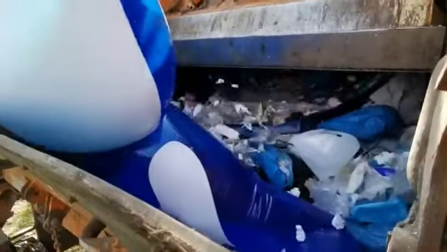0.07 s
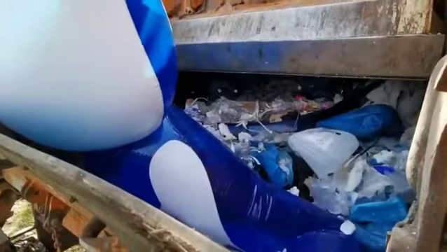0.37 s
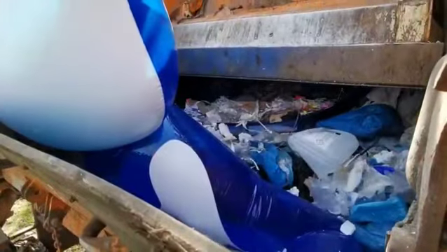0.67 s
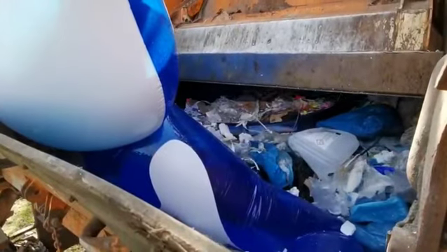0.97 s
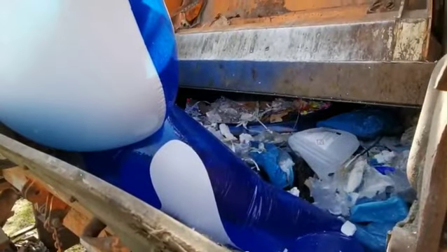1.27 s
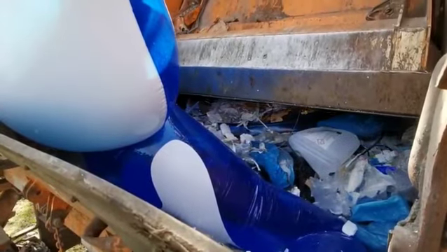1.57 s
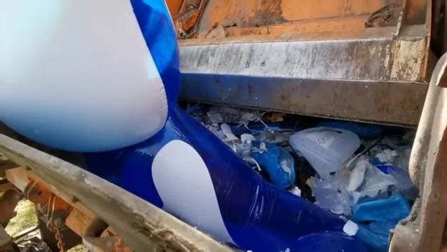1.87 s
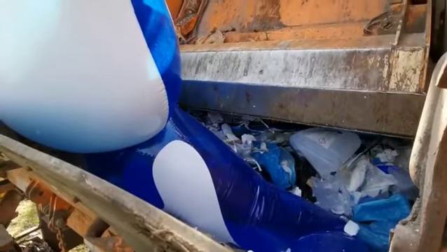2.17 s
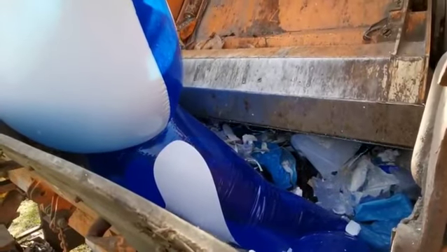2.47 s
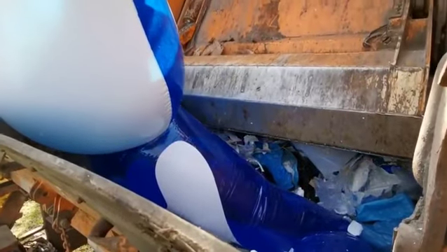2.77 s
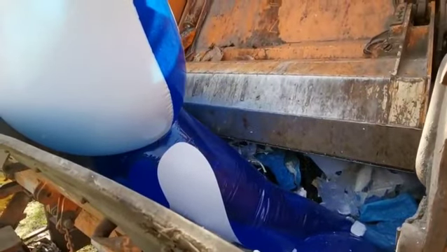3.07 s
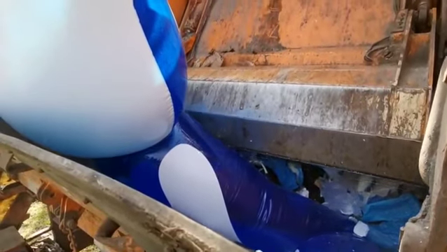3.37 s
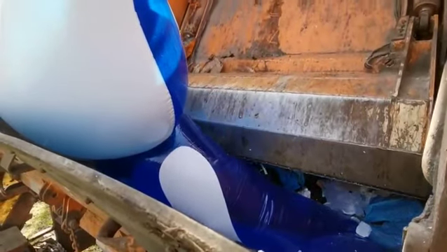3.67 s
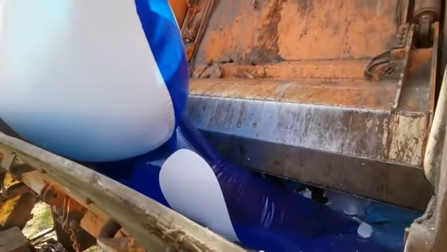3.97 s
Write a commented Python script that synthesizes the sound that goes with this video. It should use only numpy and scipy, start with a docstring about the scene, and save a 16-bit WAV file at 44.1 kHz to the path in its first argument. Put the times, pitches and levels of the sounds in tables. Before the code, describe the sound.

A garbage truck's compactor works close by, its hydraulic pump humming over rushing oil and a diesel rumble. In the first half second, trash gives way with loud crackling, booming thuds and hollow knocks on steel. Plastic snaps several times before 0.8 seconds, again near 1.8, then more faintly. The hum deepens from about 1.5 seconds and holds until 4. A small bird chirps faintly from 2.3 to 3.7 seconds.

```python
"""A load gives way in a garbage truck's hopper, heard from beside it on a stereo microphone pair.
Debris crackles in a spray, lumps thud and knock in the steel tub, and plastic snaps now and then.
Behind it the hydraulic pump hums over rushing oil and the diesel engine, deeper as the blade
comes down and takes up load. Out in the street a small bird sings a falling phrase."""
import sys
import numpy as np
from scipy import signal
from scipy.fft import rfft, irfft, next_fast_len
from scipy.io import wavfile
from scipy.ndimage import uniform_filter1d, map_coordinates

SR = 44100
rng = np.random.default_rng(int(sys.argv[2]) if len(sys.argv) > 2 else 0)


def to_wav(s):
    """Save 16-bit WAV."""
    ch = np.atleast_2d(s).T  # columns
    pcm = np.round(np.clip(ch, -1, 1) * 32767)  # PCM
    wavfile.write(sys.argv[1], SR, pcm.astype(np.int16))


N = 176400
PUMP_HZ = 192.5


def amp(db):
    """Decibels to gain."""
    return 10 ** (np.asarray(db) / 20)


def unit(x):
    """Scale to rms 1."""
    return x / np.sqrt(np.mean(x ** 2) + 1e-20)


def along(points, hz):
    """Read (freq_hz, value) points on a log frequency axis."""
    freqs, values = np.transpose(points)
    return np.interp(np.log(hz + 1), np.log(freqs + 1), values)


def curves(rows):
    """One value per sample for each column after the time."""
    times, *columns = np.transpose(rows)
    return [np.interp(np.arange(N) / SR, times, column) for column in columns]


def wobble(rate):
    """A smooth random curve, rate knots a second."""
    return map_coordinates(rng.standard_normal(1024), [np.arange(N) * rate / SR], mode="mirror")


def filtered(x, response):
    """Filter x by a gain given as a function of frequency."""
    size = next_fast_len(N + SR // 4)
    return irfft(rfft(x, size) * response(np.fft.rfftfreq(size, 1 / SR)), size)[..., :N]


def spread(pair, spectrum):
    """Two unrelated signals become one coloured stereo sound of rms 1."""
    # how alike the two microphones hear it: freq_hz, correlation
    likeness = [(150, 1), (270, 1), (400, 0.53), (650, 1), (1100, 0.42), (2000, 0.16), (6000, 0.15),
                (11000, 0.8)]

    def mid_side_gains(hz):
        angle = np.arccos(np.clip(along(likeness, hz), -1, 1)) / 2
        return amp(along(spectrum, hz)) * [np.cos(angle), np.sin(angle)]

    mid, side = filtered(pair, mid_side_gains)
    return unit(np.array([mid + side, mid - side]))


def rush(spectrum):
    """Coloured stereo noise of rms 1."""
    return spread(rng.standard_normal((2, N)), spectrum)


def patchy(x, depth_db):
    """Let narrow patches of a noise swell and sink, at rms 1 overall."""
    spectra = signal.stft(x, nperseg=1024)[2]
    field = uniform_filter1d(rng.standard_normal(spectra.shape[1:]), size=5, axis=0)
    field = unit(uniform_filter1d(field, size=12, axis=1))
    return unit(signal.istft(spectra * amp(depth_db * field), nperseg=1024)[1][:, :N])


def tone(hz):
    """A sine of rms 1 that follows a pitch curve."""
    return np.sqrt(2) * np.sin(2 * np.pi * (np.cumsum(hz) / SR + rng.random()))


def add(track, start_s, sound):
    """Mix a sound into the track at a time."""
    part = track[max(round(start_s * SR), 0):][:len(sound)]
    part += sound[:len(part)]


def blows(hits, rise_s, t60_s):
    """The envelope of (start_s, level_db) hits that rise and die away, summed in power."""
    power = np.zeros(N)
    for start_s, db in hits:
        age = np.maximum(np.arange(N) / SR - start_s, 0)
        power += (amp(db - 60 * age / t60_s) * (1 - np.exp(-age / rise_s))) ** 2
    return np.sqrt(power)


def ringing(hits, modes, rise_s):
    """Each (start_s, level_db) hit rings a set of (pitch_hz, level_db, t60_s) modes."""
    track, t = np.zeros(N), np.arange(SR) / SR
    ring = sum(amp(db - 60 * t / t60_s) * np.sin(2 * np.pi * hz * t) for hz, db, t60_s in modes)
    for start_s, db in hits:
        add(track, start_s, amp(db) * ring * (1 - np.exp(-t / rise_s)))
    return track


def bird():
    """Short gliding, trilled whistles, far enough off that the street's echo outweighs them."""
    # the phrase: start_s, length_s, start_hz, end_hz, relative_db, trill_depth_hz
    notes = [(2.345, 0.0364, 5410, 5850, -54, 300), (2.445, 0.058, 7500, 7700, -56.5, 160),
             (2.579, 0.047, 4680, 5000, -44.5, 280), (2.671, 0.057, 6800, 6990, -44.5, 200),
             (2.717, 0.027, 6500, 6350, -52, 60), (2.802, .04, 4150, 3890, -45, 150),
             (2.889, 0.052, 4225, 4730, -38, 90), (2.994, 0.049, 3550, 3180, -49, 120),
             (3.333, 0.03, 5300, 5150, -46, 250), (3.359, 0.028, 4190, 4480, -44, 120),
             (3.4, 0.036, 3900, 4360, -37.5, 420), (3.454, 0.047, 3280, 3430, -44.5, 200),
             (3.616, 0.046, 3620, 3170, -46, 150)]
    trill_hz, direct_db, echo_db, echo_t60_s = 131.7, -5.0, -1.5, 0.19
    song = np.zeros(N)
    for start_s, length_s, start_hz, end_hz, db, depth_hz in notes:
        t = np.arange(int(length_s * SR)) / SR
        glide = start_hz + (end_hz - start_hz) * t / length_s
        trill = depth_hz * np.sin(2 * np.pi * trill_hz * t)
        arch = np.sqrt(np.abs(np.sin(np.pi * t / length_s)))
        add(song, start_s, amp(db) * arch * tone(glide + trill))
    t = np.arange(SR // 2) / SR
    street = rng.standard_normal((2, len(t))) * amp(-60 * t / echo_t60_s)
    echo = signal.fftconvolve(song[None], street / np.linalg.norm(street[0]), axes=1)[:, :N]
    return amp(direct_db) * song + amp(echo_db) * echo


def engine():
    """Diesel crankshaft orders on the rumble of the truck's body."""
    # engine tones: crank_multiple, level_db
    orders = [(2, -51), (4, -42), (5, -42.5), (7, -40), (10, -43)]
    # body rumble: freq_hz, density_db
    rumble_spectrum = [(20, -8), (45, -5.5), (65, -2.5), (90, -0.5), (135, 1.5), (160, 9), (215, 0),
                       (280, 2.5), (330, -2), (390, 4), (450, -6), (700, -56)]
    crank_hz, rumble_db = 23.2, -33
    hz = crank_hz * (1 + 0.00298 * wobble(5.1))
    drone = sum(amp(db + 0.29 * wobble(6.93)) * tone(round(k) * hz) for k, db in orders)
    return drone + amp(rumble_db) * rush(rumble_spectrum)


def oil():
    """Oil rushes through valves and pipes, pulsing with the pump."""
    # strength of the flow: time_s, level_db
    flow_levels = [(0, -36), (.8, -35), (1.8, -34), (2.6, -35.5), (3.3, -34), (4, -34)]
    # flow noise: freq_hz, density_db
    flow_spectrum = [(200, -36), (480, -2.5), (780, 1), (1000, -3.5), (1220, 0), (1480, -9), (1900, -6.5),
                     (2300, -11.5), (2700, -10.5), (3400, -15), (3800, -18.5), (5000, -25.5), (5800, -34),
                     (8000, -33.5), (11500, -74)]
    level_db, = curves(flow_levels)
    ripple = unit(1 + 0.065 * tone(np.full(N, PUMP_HZ)))
    return amp(level_db + 0.39 * wobble(21.82)) * ripple * patchy(rush(flow_spectrum), depth_db=2.2)


def pump():
    """Pressure ripple of the hydraulic pump; the fundamental swells with load, the overtones flutter."""
    # the hum as the blade takes up load: time_s, fundamental_db, octave_db
    hum_levels = [(0, -43, -42), (.55, -41.5, -30.5), (1.1, -47, -27.5), (1.5, -35, -29.5), (2, -28, -30),
                  (2.5, -25.5, -30.5), (3.2, -27, -30), (3.6, -28, -31.5), (4, -29, -33)]
    # upper partials: pump_multiple, level_db, left_minus_right_db
    overtones = [(3, -45.5, 10.5), (4, -39, -6.5), (6, -45.5, -13)]
    jitter, drift, flutter_db = 0.002, 0.004, 0.4
    fade_from_db, fade_s = -11.5, 1.5
    hz = PUMP_HZ * (1 + jitter * wobble(25.3))
    fundamental_db, octave_db = curves(hum_levels)
    hum = amp(fundamental_db + 0.45 * wobble(14)) * tone(hz)
    hum += amp(octave_db + 0.1 * wobble(25.34)) * tone(2 * hz)
    fade_in_db = fade_from_db * np.maximum(1 - np.arange(N) / SR / fade_s, 0)
    for k, db, pan_db in overtones:
        level_db = db + fade_in_db + flutter_db * wobble(23.8) + np.array([[pan_db], [-pan_db]]) / 2
        hum = hum + amp(level_db) * tone(round(k) * hz * (1 + drift * wobble(39.21)))
    return hum


def knocks():
    """Hard pieces scuff the steel tub and ring it hollowly, each spot at its own pitch."""
    # pieces striking the wall: start_s, level_db, pitch_hz
    strikes = [(.058, -15.5, 497), (.104, -15, 694), (.122, -14, 646), (.165, -22.5, 747), (.192, -22, 630),
               (.350, -13.5, 546), (.410, -22, 568), (.504, -21, 571), (1.846, -27, 440)]
    # modes of the wall: pitch_multiple, relative_db
    wall_modes = [(1, -0.5), (1.52, -11), (1.9, -13)]
    # contact noise: freq_hz, density_db
    scuff_spectrum = [(200, -14), (530, 1), (640, -7.5), (820, -2.5), (1100, -12), (1500, -22), (2000, -14),
                      (4000, -40), (10000, -53)]
    rise_s, wall_t60_s, scuff_t60_s, scuff_db = 0.003, 0.11, 0.13, -5
    wall = np.zeros(N)
    for start_s, db, hz in strikes:
        modes = [(hz * k, mode_db, wall_t60_s) for k, mode_db in wall_modes]
        wall += ringing([(start_s, db)], modes, rise_s)
    scuffs = [(start_s, db + scuff_db) for start_s, db, _ in strikes]
    return wall + blows(scuffs, rise_s, scuff_t60_s) * rush(scuff_spectrum)


def snaps():
    """Plastic snaps under the blade: sudden bursts of noise with a bright edge."""
    # plastic breaking: start_s, body_db, edge_db
    breaks = [(.351, -32.5, -48), (0.573, -30.5, -44), (.773, -32.5, -49), (1.844, -35, -54),
              (2.2, -46, -53), (2.775, -46, -47)]
    # body of a snap: freq_hz, density_db
    body_spectrum = [(400, 4), (1000, -6), (2000, 12), (4500, -1), (11500, -16)]
    # its bright edge: freq_hz, density_db
    edge_spectrum = [(3000, -38), (7500, 3), (11500, -3)]
    rise_s, t60_s = 0.0013, 0.16
    body = blows([(start_s, db) for start_s, db, _ in breaks], rise_s, t60_s) * rush(body_spectrum)
    edge = blows([(start_s, db) for start_s, _, db in breaks], rise_s, t60_s) * rush(edge_spectrum)
    return body + edge


def thuds():
    """Heavy lumps land softly; they set the hopper booming and tumble on in a rumble."""
    # lumps landing: start_s, level_db, pitch_hz
    lumps = [(.064, -16, 85), (0.107, -18.5, 316), (.112, -11, 203.5), (0.149, -18, 304), (.152, -12, 115),
             (.188, -6.5, 180), (.203, -6, 103), (0.439, -22, 156)]
    # modes of the hopper: pitch_hz, relative_db, t60_s
    hopper_modes = [(83, -15, 1), (160.76, -6.5, 0.95), (217, -12, 0.83), (310, -25, 0.5)]
    # the tumbling load: freq_hz, density_db
    tumble_spectrum = [(25, -22), (55, -13), (90, -3), (220, 3), (330, -10.5), (600, -16), (3000, -77)]
    rise_s, swell_s, tumble_db = 0.006, 0.014, -15.5
    hits = [(start_s, db) for start_s, db, _ in lumps]
    boom = ringing(hits, hopper_modes, rise_s)
    t = np.arange(SR // 2) / SR
    swell = (t / swell_s * np.exp(1 - t / swell_s)) ** 2
    for start_s, db, hz in lumps:
        add(boom, start_s, amp(db) * swell * np.sin(2 * np.pi * hz * t))
    return boom + amp(tumble_db) * blows(hits, rise_s, t60_s=1) * rush(tumble_spectrum)


def debris():
    """A spray of tiny plastic crackles that fades, and returns as the blade bites again."""
    # strength of the spray: time_s, level_db
    crackle_levels = [(0, -23.5), (.1, -24), (.16, -30), (.22, -37.5), (.31, -40.5), (.43, -37),
                      (.54, -40.5), (.62, -44.5), (.8, -52.5), (1.3, -51.5), (2.6, -56.5), (3.3, -53),
                      (3.85, -49.5), (4, -43.5)]
    # colour of the crackles: freq_hz, density_db
    crackle_spectrum = [(300, 8), (900, 0.5), (1900, 5.5), (2400, 2), (5000, 2.5), (6000, 1.5), (8500, -2),
                        (11500, -5)]
    grains_per_s, size_spread_db, hiss_db = 2500, 0.5, 3.5
    level_db, = curves(crackle_levels)
    size_db = size_spread_db * np.minimum(rng.exponential(size=(2, N)), 4)
    sizes = amp(size_db) * rng.standard_normal((2, N))
    grains = unit(sizes * (rng.random((2, N)) < grains_per_s / SR))
    clumps_db = 1.2 * wobble(14) + 1.1 * wobble(45)
    hiss = amp(hiss_db) * rng.standard_normal((2, N))
    return amp(level_db + clumps_db) * spread(grains + hiss, crackle_spectrum)


def arrival_lag(hz):
    """Left and right phase shifts that bring the middle range to the right microphone first."""
    lag_s, corner_hz = 0.00027, 340
    cycles = np.minimum(hz * lag_s / (1 + (corner_hz / (hz + 1)) ** 8), 2)
    return np.exp(1j * np.pi * cycles * np.array([[-1], [1]]))


def hollowed(x):
    """A narrow dip in the sound at the microphones climbs as the blade comes down."""
    # path of the dip: time_s, centre_hz
    dip_path = [(0, 1434), (3.1, 1432), (3.8, 1590), (4, 1800)]
    width_hz, depth_db = 90, -12
    hz, times, spectra = signal.stft(x, SR, nperseg=1024)
    centre_hz = np.interp(times, *np.transpose(dip_path))
    dip_db = depth_db * np.exp(-((hz[:, None] - centre_hz) / width_hz) ** 2)
    return signal.istft(spectra * amp(dip_db), nperseg=1024)[1][:, :N]


def scene():
    """The truck, its load and the bird, heard from beside the hopper."""
    machine = filtered(pump() + oil() + knocks() + snaps(), arrival_lag)
    return machine + engine() + debris() + thuds() + bird()


def record(dry):
    """Each microphone has its own colour above the bass; nothing is kept above the band limit."""
    # balance of the microphone pair: freq_hz, left_minus_right_db
    balance = [(310, -2), (390, -4.5), (470, -1.5), (900, 7), (1280, 8), (1500, 1), (2300, 2.5),
               (2700, 4.5), (4000, 3), (4700, 13), (5700, 0.5), (7000, 9.5), (8600, -0.5), (9800, -12.5),
               (11500, -4.5)]
    bass_hz, top_hz = 250, 11700
    sides_db = lambda hz: along(balance, hz) * (hz > bass_hz) * np.array([[.5], [-.5]])
    return filtered(hollowed(dry), lambda hz: amp(sides_db(hz)) * (hz < top_hz))


dry = scene()
out = record(dry)
to_wav(out)
```